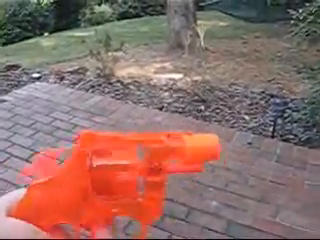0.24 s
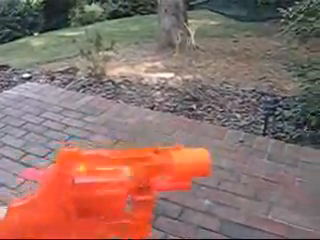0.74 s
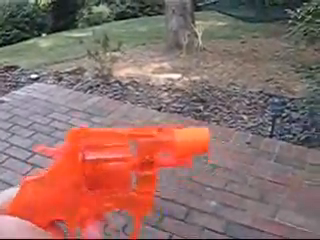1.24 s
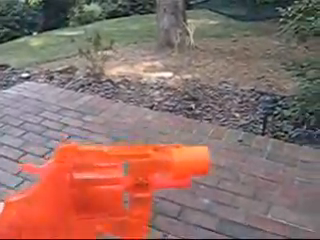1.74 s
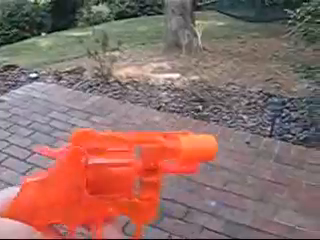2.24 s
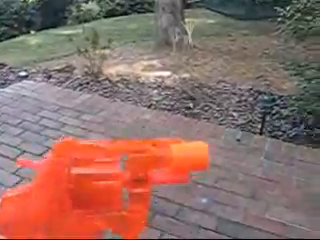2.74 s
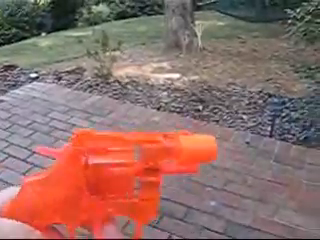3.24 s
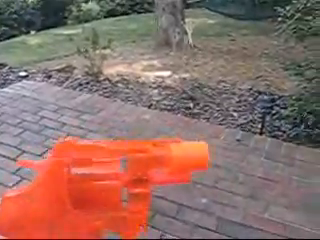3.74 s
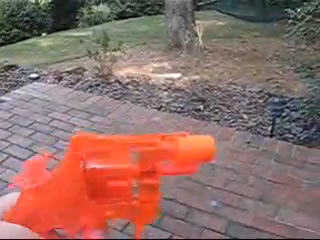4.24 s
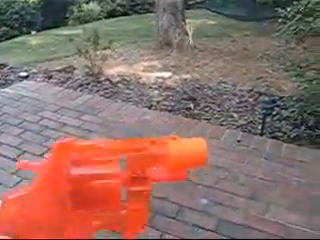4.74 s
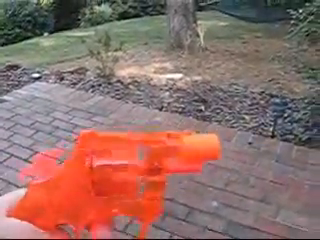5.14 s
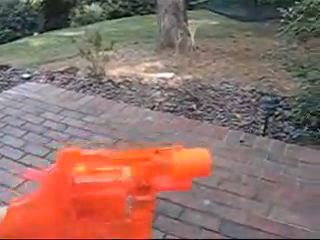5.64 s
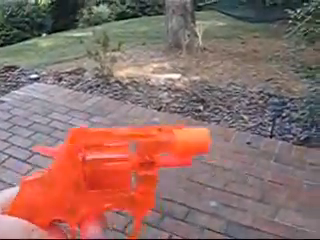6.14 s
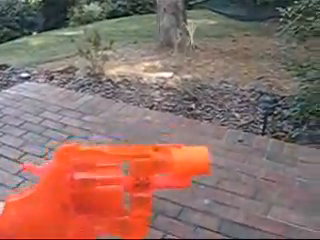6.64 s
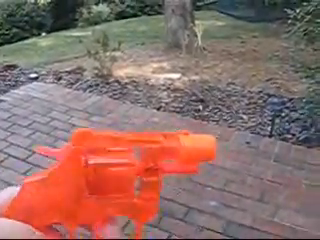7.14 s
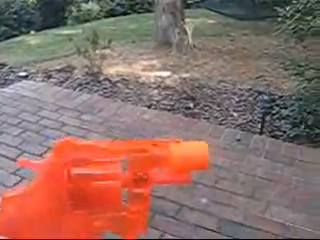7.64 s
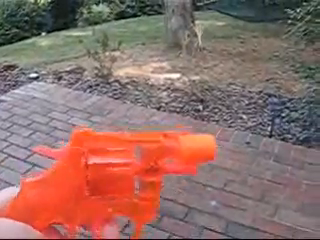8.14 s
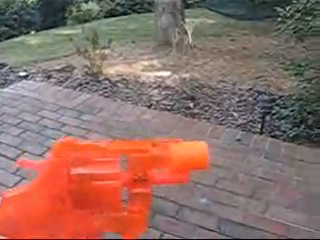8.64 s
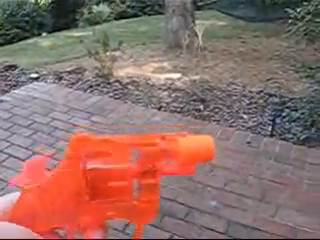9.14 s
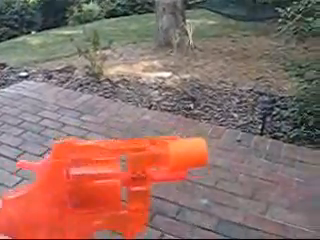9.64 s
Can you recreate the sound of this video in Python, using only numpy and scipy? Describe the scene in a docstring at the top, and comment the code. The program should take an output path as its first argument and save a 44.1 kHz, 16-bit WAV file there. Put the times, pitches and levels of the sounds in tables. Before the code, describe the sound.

A plastic toy cap revolver cracks off nine fast sharp snaps each second, close by outdoors, with a tiny hush before every repeated run.

```python
"""Toy cap revolver in a garden

A plastic cap revolver snaps close by on a brick patio: nine shots a tenth of a second apart, looped
about once a second with a short hush between. Each cap is a noise spurt ringing the frame, with
hammer zing and a resonant puff of gas. Paving and shrubs return decaying noise, the lock clicks, a low
drone of noise and tones swells before each shot, and outdoor hiss lies beneath."""
import sys
import numpy as np
from scipy import signal
from scipy.fft import rfft, irfft
from scipy.io import wavfile

SR = 44100
rng = np.random.default_rng(int(sys.argv[2]) if len(sys.argv) > 2 else 0)


def file_out(sig):
    """Save sig as 16-bit WAV at sys.argv[1]."""
    # one column per channel
    cols = np.atleast_2d(sig).T
    # limit, then scale
    lim = np.clip(cols, -1, 1)
    pcm = np.round(lim * 32767).astype(np.int16)
    wavfile.write(sys.argv[1], SR, pcm)


N = 435708
T = np.arange(SR) / SR  # one burst: 1 s
HZ = np.maximum(np.arange(SR // 2 + 1), 1.)


def undb(db):
    """Decibels to gain."""
    return 10 ** (np.asarray(db) / 20)


def unit(x):
    """Scale to rms 1."""
    return x / np.sqrt(np.mean(np.square(x)))


def modes(rows):
    """Frequency response of damped resonances; each row: Hz, width in Hz, dB."""
    return sum(undb(db) / (1 + 1j * (HZ ** 2 - hz ** 2) / (HZ * width_hz)) for hz, width_hz, db in rows)


def colour(points):
    """Frequency response through (Hz, dB) points, interpolated over log frequency."""
    hz, db = np.transpose(points)
    return undb(np.interp(np.log(HZ), np.log(hz), db))


def bump(hz, octaves):
    """Bell of height 1 over log frequency."""
    return np.exp(-(np.log2(HZ / hz) / octaves) ** 2)


def noise(response):
    """Noise of rms 1 with the given frequency response."""
    return unit(irfft(rfft(rng.standard_normal(SR)) * response))


def delay(seconds):
    """Frequency response of a delay."""
    return np.exp(-2j * np.pi * HZ * seconds)


# Nine shots of a burst. Each row: time in the burst in seconds, then levels in dB of crack, gas,
# bark band, edge band, hammer zing, and garden echo (before a fixed 6 dB cut).
SHOTS = [(.0931, 0, 12, -3, -1, 7, -27.5), (.2009, -0.5, 5.5, 3, -0.5, 11, -28.5),
         (.2989, 2.5, -.5, 4, -7, -24, -28.5), (.3976, 3.5, 10.5, -2, -4, 11.5, -28),
         (.4959, 1.5, 1, 3.5, -8.5, 3.5, -31.5), (.593, 2.5, 14, -3, -6.5, 9, -29),
         (.6981, 4.5, 15, -8, -6.5, 9.5, -29.5), (.7946, 1, 0.5, -2, -1.5, 11, -28.5),
         (.8910, -8.5, -14, -2.5, -3.5, 16, -79)]
FIRST_S, LOOP_S, STEPS_PER_S = .06782, .98, 30  # first start, mean period, restart grid
DRONE_DB, OPENING_DB = -58.5, -39  # drone noise peak before later shots, before the first


def scene():
    """Build the burst once and repeat it at each round."""
    burst = hiss() + lock()
    for k, (at, *charge, echo_db) in enumerate(SHOTS):
        drone_db = DRONE_DB if k else OPENING_DB
        burst = burst + cap(at, *charge) + garden(at, echo_db) + drone(at, drone_db)
    out = np.zeros(N + 2 * SR)  # 1 s margin at each end
    for start in rounds():
        i = SR + round(start * SR)
        out[i:i + SR] += burst
    return out[None, SR:SR + N]


def rounds():
    """Start times of the loop: evenly spaced, each pulled back to a whole step."""
    steps = np.arange(-1, N / SR / LOOP_S) * LOOP_S * STEPS_PER_S
    return FIRST_S + np.floor(steps + .1) / STEPS_PER_S


NULL_HZ, NULL_WIDTH_HZ, NULL_DB = 1223, 317, -2.5  # weakly radiated band; dB of the part subtracted


def cap(at, crack_db, gas_db, bark_db, edge_db, zing_db):
    """Hammer, flash and gas sound in turn, less a band that the gun radiates weakly."""
    # more gas: louder pop
    pop_db = 1 + 0.61 * gas_db
    shot = zing(zing_db) * delay(-0.00059)
    shot = shot + crack(crack_db, gas_db, bark_db, edge_db) * delay(-0.000346)
    shot = shot + puff(gas_db, pop_db) * delay(0.00029)
    radiated = 1 - modes([(NULL_HZ, NULL_WIDTH_HZ, NULL_DB)])
    return irfft(shot * radiated * delay(at))


# Resonances of the plastic frame and cylinder. Each row: frequency in Hz, width in Hz, level in dB.
FRAME = [(1465, 670, 2.5), (2174, 250, 1.5), (2622, 97, 2), (2938, 195, -1), (3499, 436, 9),
         (4100, 134, 5.5), (4504, 200, 7), (4905, 214, 2.5), (5383, 170, 3), (5820, 130, 3),
         (6350, 214, -1), (6770, 146, 3.5), (7430, 380, -2), (7920, 92, 0.5), (8000, 130, -6),
         (8490, 520, -5.5), (8710, 114, 0.5), (9230, 390, -9), (9360, 150, -7.5), (10500, 100, -6),
         (11400, 350, 0)]
BARK_HZ, CHAMBER_HZ, EDGE_HZ = 2730, 3400, 4490
CHAMBER_DB = 0.83  # chamber ring in every crack


def crack(crack_db, gas_db, bark_db, edge_db):
    """The flash rings the frame; more gas makes it duller."""
    tilt_db_per_octave = 2.5 - 0.15 * gas_db
    tone_db = tilt_db_per_octave * np.log2(np.maximum(HZ, 1000) / 5000)
    tone_db = tone_db + bark_db * bump(BARK_HZ, 0.35)
    tone_db = tone_db + CHAMBER_DB * bump(CHAMBER_HZ, 0.18)
    tone_db = tone_db + edge_db * bump(EDGE_HZ, 0.51)
    return flash(burn_s=0.00051) * modes(FRAME) * undb(crack_db + tone_db)


def flash(burn_s):
    """Spectrum of a brief turbulent spurt, nearly even in strength at all pitches."""
    spurt = rfft(rng.standard_normal(SR) * T * np.exp(-T / burn_s))
    strength = unit(np.abs(spurt))
    evened = strength / np.hypot(strength, .25)
    return unit(evened) * np.exp(1j * np.angle(spurt))


LOWER_HZ, UPPER_HZ, HAMMER_WIDTH_HZ = 11470, 12030, 310
LOWER_RING_DB = -2  # relative to the upper ring


def zing(zing_db):
    """Two high resonances of the struck hammer, confined to their own band."""
    rings = modes([(LOWER_HZ, HAMMER_WIDTH_HZ, zing_db + LOWER_RING_DB),
                   (UPPER_HZ, HAMMER_WIDTH_HZ, zing_db)])
    return rings * bump((LOWER_HZ + UPPER_HZ) / 2, 0.31)


def puff(gas_db, pop_db):
    """Escaping gas: low thump and pop, with no treble because it pushes longer than the crack."""
    push = modes([(235, 296, gas_db), (693, 450, pop_db), (866, 50, pop_db - 16.0)])
    return -push / (1 + (HZ / 1600) ** 4)


# Small clicks of the lock. Each row: time in the burst in seconds, level in dB.
TICKS = [(0.533, -22.5), (0.9319, -33)]


def lock():
    """Light clicks of the pawl ring the same frame."""
    clicks = sum(undb(db) * flash(burn_s=0.00016) * delay(at) for at, db in TICKS)
    return irfft(clicks * modes(FRAME))


# Distinct returns from paving and walls. Each row: delay in seconds, dB relative to the diffuse echo.
RETURNS = [(.011, -1.5), (.0275, -23), (.0372, -16)]
# Colour of the garden echo. Each row: frequency in Hz, relative density in dB per Hz.
ECHO = [(150, -7), (1000, -35), (1600, -6.5), (2600, -1), (3250, 1.5), (3900, -3), (5500, 1), (6500, 3),
        (7700, 6.5), (8600, 7), (9600, 7.5), (11000, 5.5), (12400, 8)]


def garden(at, db, t60_s=0.23, build_s=0.0012, return_s=0.0029):
    """Paving and leaves scatter a bright decaying echo, with a few distinct returns in it."""
    age_s = np.maximum(T - at, 0)
    returns = sum(undb(gain_db) * np.exp(-((age_s - lag_s) / return_s) ** 2) for lag_s, gain_db in RETURNS)
    build = 1 - np.exp(-age_s / build_s)
    fade = np.exp(-np.log(1000) * age_s / t60_s)
    return undb(db - 6.0) * build * fade * (1 + returns) * noise(colour(ECHO))


# Resonances of the low outdoor drone. Each row: frequency in Hz, width in Hz, relative level in dB.
DRONE = [(71, 150, -12), (258, 40, 3), (400, 170, -5.5), (562, 110, -10.5), (690, 35, -13), (805, 15, 1),
         (980, 43, -5), (1227, 124, -7.5), (1860, 120, -11), (2480, 150, -39)]
# Steady tones in the drone. Each row: frequency in Hz, dB relative to the drone noise.
HUM = [(210, -8), (422, -10), (940, -13.5)]


def drone(at, db, rise_db_per_s=115, drop_s=0.00039):
    """Resonant noise and sine tones swell in the gap before a shot and drop away as it fires."""
    swell = undb(-rise_db_per_s * np.maximum(at - T, 0))
    drop = np.exp(-np.maximum(T - at, 0) / drop_s)
    gap = np.clip((T - at + .0905) / 0.0052, 0, 1)  # opens 90.5 ms before the shot
    hum = 0
    for hz, tone_db in HUM:
        hum = hum + undb(tone_db) * unit(np.sin(2 * np.pi * (hz * T + rng.random())))
    return undb(db) * swell * drop * gap * (noise(modes(DRONE)) + hum)


# Colour of the outdoor hiss. Each row: frequency in Hz, relative density in dB per Hz.
AIR = [(30, 11), (90, -5), (220, -8), (420, -1), (800, -5), (1500, -5.5), (3000, -5.5), (5000, -6),
       (8000, -5), (12000, -1.5)]
HISS_DB, HUSH_DB = -48, -3  # level in the burst, change after the last shot
HISS_ATTACK_S, FADE_AT_S, FADE_DB_PER_S = .003, 0.94, 907


def hiss():
    """Even outdoor noise that drops after the last shot, then fades fast at the end of the burst."""
    hush_db = HUSH_DB * (T > SHOTS[-1][0])
    fade_db = -FADE_DB_PER_S * np.maximum(T - FADE_AT_S, 0)
    attack = np.minimum(T / HISS_ATTACK_S, 1)
    return undb(HISS_DB + hush_db + fade_db) * attack * noise(colour(AIR))


CEILING, TOP_HZ = .5, 12480  # full scale, low-pass cutoff


def record(dry):
    """Saturation rounds the highest peaks; a steep low-pass cuts the top."""
    rounded = CEILING * np.tanh(dry / CEILING)
    low_pass = signal.firwin(601, TOP_HZ, fs=SR, window=("kaiser", 7))
    return signal.fftconvolve(rounded, low_pass[None], mode="same", axes=1)


dry = scene()
out = record(dry)
file_out(out)
```